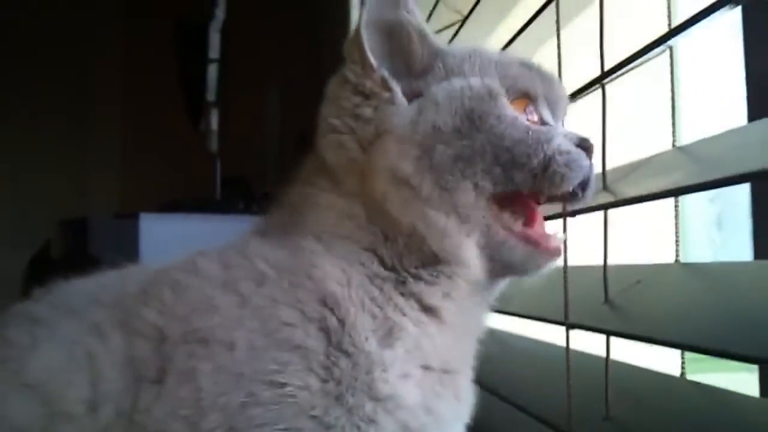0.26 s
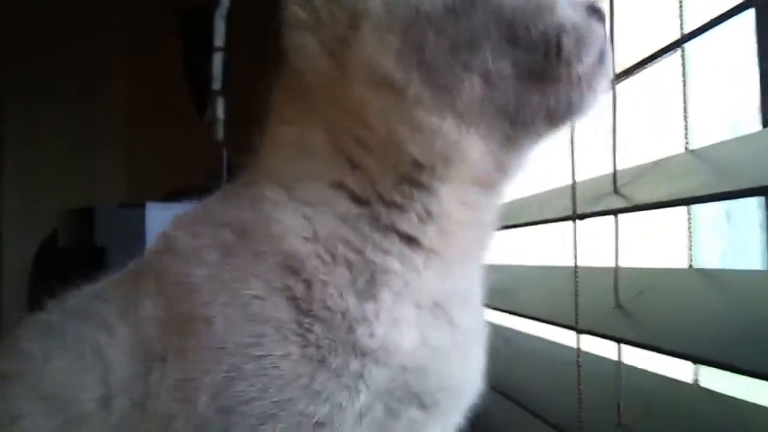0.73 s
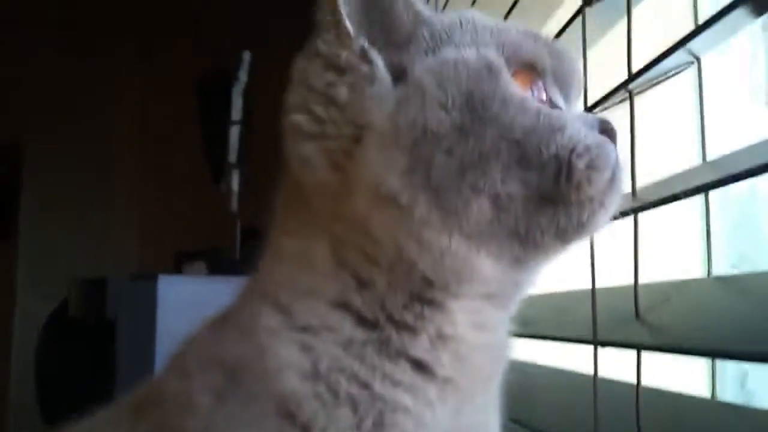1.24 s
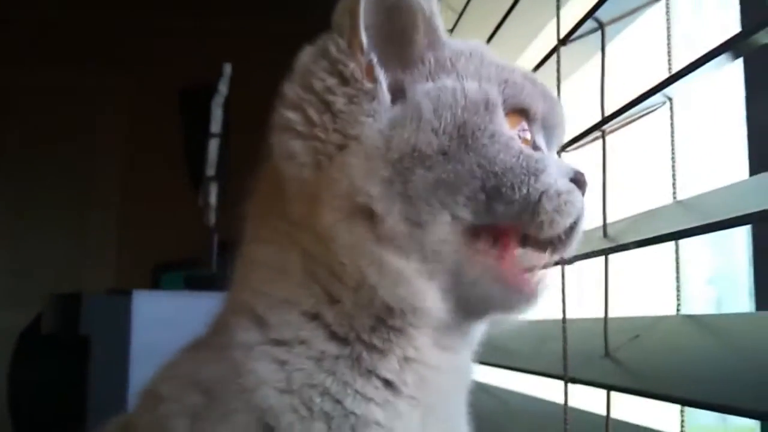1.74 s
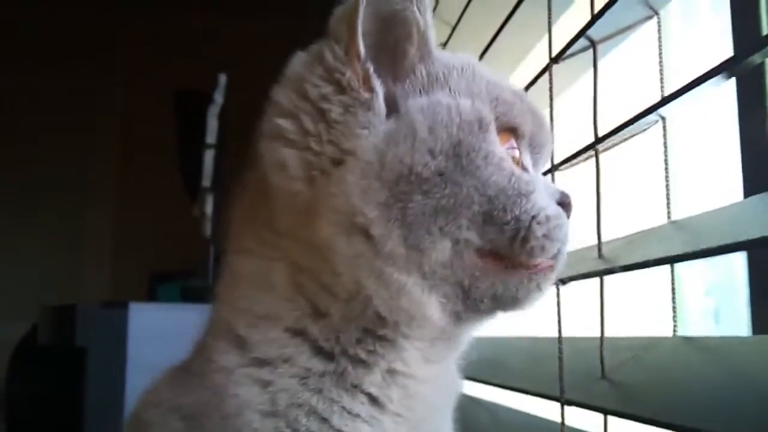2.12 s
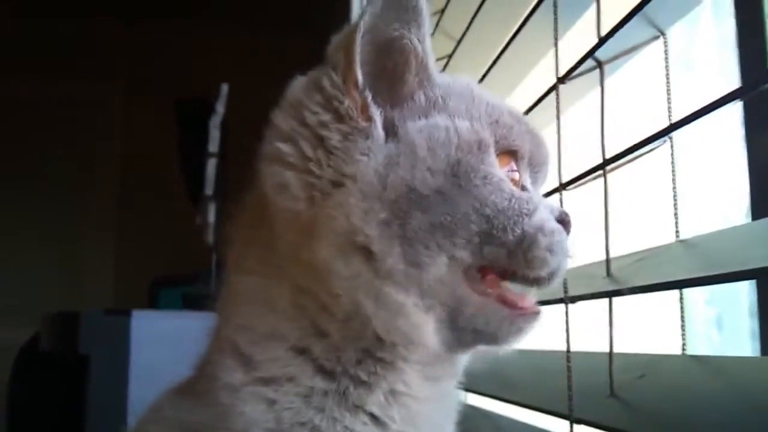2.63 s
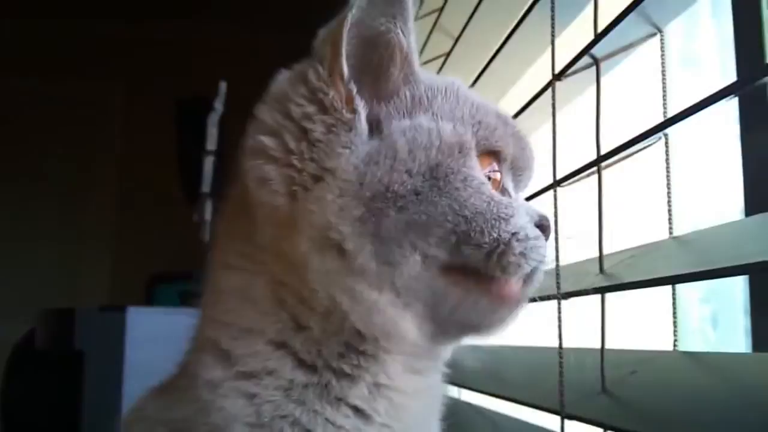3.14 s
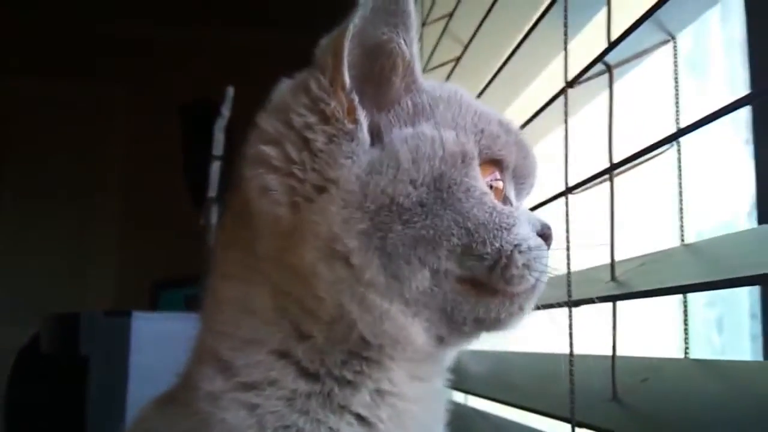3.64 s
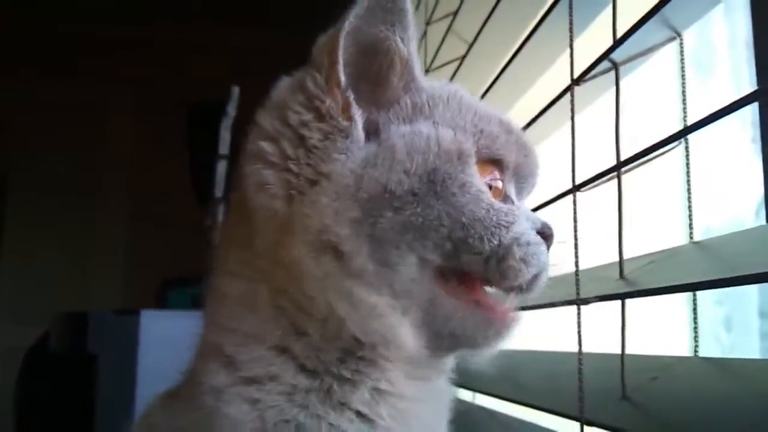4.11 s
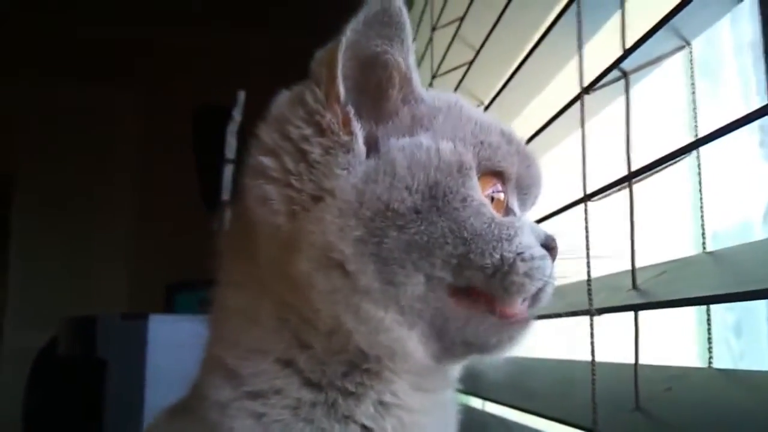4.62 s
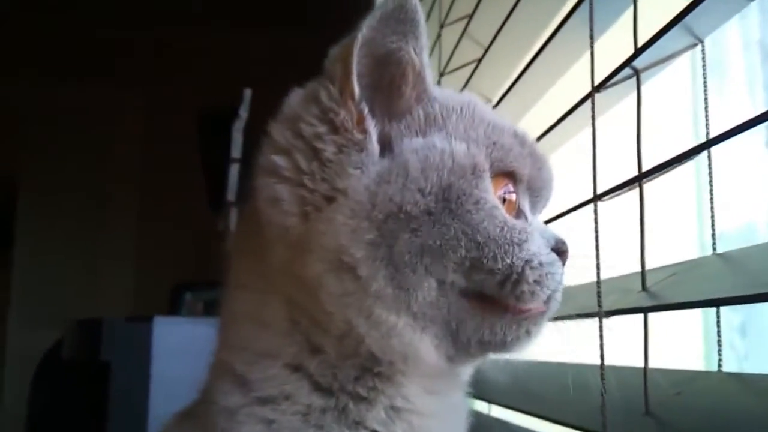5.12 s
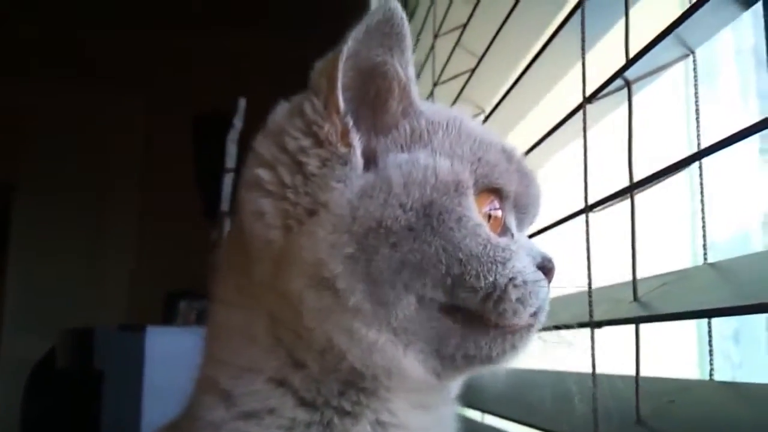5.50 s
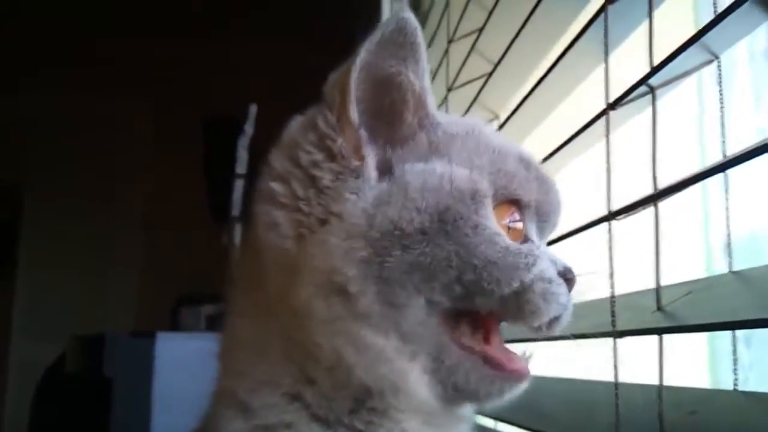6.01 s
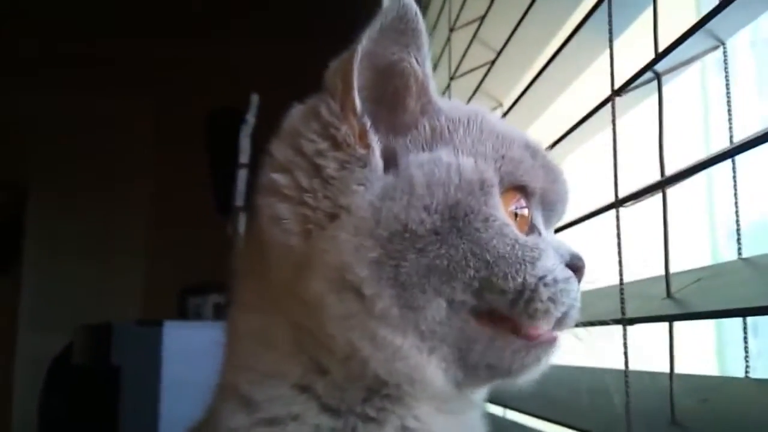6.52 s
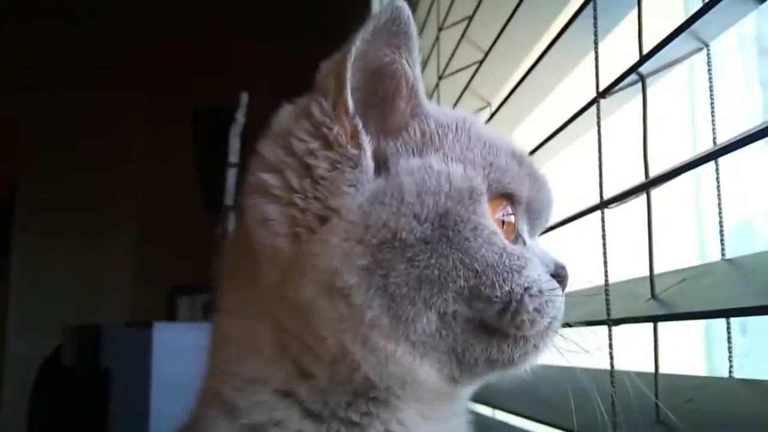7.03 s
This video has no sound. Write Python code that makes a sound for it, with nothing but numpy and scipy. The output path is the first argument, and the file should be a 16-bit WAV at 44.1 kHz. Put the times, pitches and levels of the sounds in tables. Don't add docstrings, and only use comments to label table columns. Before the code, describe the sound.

A steady low mains hum and soft, bass-heavy hiss run throughout, in a small room with a faint short echo. At about 0.6 s a cat close to the microphone makes the loudest sound, a hard wet double clack with bright air and a short throaty blip. A few small ticks follow near 0.9 s, then near quiet with barely audible rustles until a tick at 1.8 s. From 2.0 s come wet smacks and a strong click; between 2.6 and 3.1 s the jaw chatters quickly, about fifteen clicks a second, each with a tiny puff and low squeaky flap. Sparse clicks fall at 3.4-4.0 s, another group at 4.4-5.0 s, then dull smacks and small squeaks to 5.4 s. After a pause, a last even chatter runs 6.1-6.6 s, ending in throaty smacks around 6.85 s and one faint blip at 7.25 s.

```python
import sys
import numpy as np
from scipy import signal
from scipy.fft import rfft, irfft, next_fast_len
from scipy.io import wavfile
from scipy.ndimage import uniform_filter1d

SR = 44100
rng = np.random.default_rng(int(sys.argv[2]) if len(sys.argv) > 2 else 0)


def store_wav(level_fs):
    pcm = np.round(np.clip(np.atleast_2d(level_fs), -1, 1) * 32767)
    wavfile.write(sys.argv[1], SR, pcm.T.astype(np.int16))


def gain_from_db(level_db):
    decades = np.asarray(level_db, float) / 20
    return 10 ** decades


N = 320166


def read(points, hz):
    f, value = np.transpose(points)
    return np.interp(np.log(hz + 1), np.log(f + 1), value)


def evened(x):
    return x / np.sqrt(np.mean(x ** 2) + 1e-20)


def add(mix, s, sound):
    part = mix[round(s * SR):][:len(sound)]
    part += sound[:len(part)]


def colour(x, points):
    size = next_fast_len(N + 4096)
    gain = gain_from_db(read(points, np.fft.rfftfreq(size, 1 / SR)))
    return irfft(rfft(x, size) * gain, size)[:N]


def resonate(x, hz, width_hz):
    r = np.exp(-np.pi * width_hz / SR)
    return signal.lfilter([1, 0, -r], [1, -2 * r * np.cos(2 * np.pi * hz / SR), r * r], x)


SNAP_MS, SNAP_SCATTER = 1.3, .012
CRACKLE_SHARE, EDGE_DB = .3, -7
PUSH_DB, PUSH_MS = -15, 4.4
CAVITY_WIDTHS = [440, 540, 520, 540, 800]


def snaps():
    out = np.zeros(N)
    ms = np.arange(400) / SR * 1000
    rows = clack_snaps() + beat_snaps() + smack_snaps() + tick_snaps()
    chance = rng.standard_normal((len(rows), 405))
    push = -np.sin(2 * np.pi * ms / PUSH_MS) * np.exp(-ms / PUSH_MS) * np.hanning(800)[400:]
    for (s, strengths, pitches), draw in zip(rows, chance):
        crackle = CRACKLE_SHARE * draw[:400] ** 3 / 4 * np.exp(-ms / SNAP_MS)
        crackle[0] = 1
        for k, (db, pitch, width_hz, slip) in enumerate(zip(strengths, pitches, CAVITY_WIDTHS, draw[400:])):
            hz = pitch * (1 + SNAP_SCATTER * slip)
            edge = resonate(crackle, hz, width_hz)
            ring = resonate(edge, hz, width_hz)
            sound = ring / abs(ring).max() + gain_from_db(EDGE_DB) * edge / abs(edge).max()
            add(out, s, (-1) ** k * gain_from_db(db) * sound)
        add(out, s, gain_from_db(min(max(strengths), -24) + PUSH_DB) * push)
    return out


THROAT_HZ, PALATE_HZ, CHEEK_HZ, TEETH_HZ = 1334, 3502, 4916, 6180
FOLLOW = .45
# t/s, tongue f/Hz, teeth f/Hz
MOUTH_SHAPE = [(.58, 2170, 6100), (.64, 2230, 7100), (.9, 2820, 6500), (1.83, 2140, 6700),
               (2.07, 2110, 6800), (2.65, 2200, 6620), (2.78, 2200, 6000), (3.07, 2310, 6320),
               (3.6, 2420, 6230), (4.6, 2360, 5950), (5.0, 2200, 6050), (6.5, 2310, 5860),
               (6.85, 2200, 5800)]


def cavities(s):
    when, tongue, teeth = np.transpose(MOUTH_SHAPE)
    teeth = np.interp(s, when, teeth)
    pull = (teeth / TEETH_HZ) ** FOLLOW
    return np.array([THROAT_HZ, np.interp(s, when, tongue), PALATE_HZ * pull, CHEEK_HZ * pull, teeth])


CLACK_PALATE_DB = -11
CLACK_SHIFT = (.87, 1.03, 1.07, .92, 0.96)
# t/s, front level/dB, teeth over cheek +-level/dB, tongue level/dB, throat level/dB
DOUBLE_CLACK = [
    (.5825, -19.5, -1.5, -24, -40),
    (.586, -19.5, 3, -22.5, -21),
    (.5892, -17.5, 1, -24, -30),
    (0.5931, -26, 5, -15.5, -21),
    (0.6317, -21, 10.5, -23.5, -41),
    (0.6359, -18, 2, -35, -22.5),
    (.6442, -23, 11.5, -34, -23.5),
    (0.6488, -25, 8, -29, -31),
]


def clack_snaps():
    return [(s, [throat, tongue, db + CLACK_PALATE_DB, db - lean, db + lean], cavities(s) * CLACK_SHIFT)
            for s, db, lean, tongue, throat in DOUBLE_CLACK]


BEAT_BACK = (-4.5, -5.5, 0.5)
# t/s, front level/dB, teeth over cheek +-level/dB, back against front level/dB, puff level/dB
JAW_BEATS = [(2.0769, -25, 3.5, -5.5, -34.5), (2.594, -28.5, 4, -5.5, -40.5), (2.6477, -33, 5, 2.5, -35.5),
             (2.716, -29, 2.5, -1.5, -36), (2.779, -36.5, 2, 3.5, -44), (2.8454, -30, 5, -0.5, -36.5),
             (2.908, -34, 2, 2.3, -43.5), (3.013, -31.5, .8, -0.8, -43), (3.0667, -34, 8.5, 0.5, -38),
             (3.7276, -29.5, 0, -4, -41.5), (3.7904, -31, -5, -2.5, -45), (3.9743, -26, .6, -14, -55),
             (4.458, -37, 6, -4.5, -47), (4.5942, -32.5, 5, -2.5, -56), (4.6547, -28.5, -.3, -14, -44),
             (4.79, -30, -0.2, -6, -43), (4.861, -34.5, -3.5, -3, -52), (4.969, -31, 1.2, -15, -60),
             (6.166, -49.5, 6, 8.5, -49), (6.234, -39, 7, -2, -44), (6.2997, -32.5, 3.5, -6.5, -47),
             (6.3656, -30, 1, -6.5, -44), (6.4326, -37, 2, -12, -50), (6.498, -30.5, 0.3, -6, -47)]


def beat_snaps():
    rows = []
    for s, db, lean, back, _ in JAW_BEATS:
        rows.append((s, [*(db + back + np.array(BEAT_BACK)), db - lean, db + lean], cavities(s)))
    return rows


SMACK_BALANCE = (-1.7, -11, -0.5, -2.1, 1.5)
# t/s, back level/dB, front against back level/dB, flap level/dB, flap f/Hz
VOICED_SMACKS = [(2.0096, -34, -12, -21.5, 385), (2.0207, -32.5, -10, -24, 620),
                 (2.0698, -33, -.5, -22.5, 345), (2.2444, -39, -18, -35, 360), (2.586, -39, -8, -35, 420),
                 (2.654, -31.5, -7, -24, 360), (2.7234, -29.5, 0.5, -26.5, 326),
                 (3.0757, -32, 0, -26.5, 300), (3.5363, -41.5, -10, -28.5, 350),
                 (3.6053, -40, -5, -31, 332), (3.7354, -36, 4, -26, 364), (3.8012, -39.5, 1, -28, 335),
                 (4.397, -45, -6, -36, 350), (5.13, -39, -14, -31.5, 360), (5.378, -41.5, -10, -35, 370),
                 (6.105, -38, -4, -32, 326), (6.3152, -40, 3, -32.5, 390), (6.4413, -37.5, -3, -30, 297),
                 (6.5071, -40, -5, -29, 357), (6.6332, -36.5, -4, -28.5, 440), (6.6371, -36, -18, -23, 345),
                 (6.8187, -30, -21, -33, 530), (6.8266, -33.5, -21, -24.5, 356),
                 (6.882, -37.5, -18, -26.5, 348)]
# t/s, back level/dB, front against back level/dB, throat against back level/dB
MUTE_SMACKS = [
    (2.005, -37, -11, 0),
    (2.061, -51, -2.1, 5),
    (2.3032, -39.5, -6, -1.1),
    (2.525, -37, -14, -5),
    (5.0012, -32.5, -14, -2.5),
    (5.1204, -41, -15, -2),
    (5.305, -32, -17, -4),
    (6.8742, -42, -16, 8.5),
]


def smack_snaps():
    front = np.array([0, 0, 0, 1, 1])
    rows = [(s, db + fore * front + SMACK_BALANCE, cavities(s)) for s, db, fore, *_ in VOICED_SMACKS]
    for s, db, fore, throat in MUTE_SMACKS:
        rows.append((s, db + fore * front + [throat, *SMACK_BALANCE[1:]], cavities(s)))
    return rows


# t/s, level/dB, place (0 throat - 4 teeth), fall per cavity level/dB
MOUTH_TICKS = [(.9007, -34, 0.7, 13), (.96, -43, 3.5, 6), (1.836, -26.5, 1.3, 16.5), (1.8913, -34, 1.2, 14),
               (2.0491, -41, 3.5, 9), (2.2196, -40, 2.5, 5), (2.2984, -43, 3, 11), (2.3111, -38, 0.5, 7),
               (2.3737, -39, 1.9, 5), (2.4925, -36.5, 4.5, 2.5), (2.661, -34, 6, 12), (2.8418, -40, 4, 0),
               (2.861, -37, 7, 13), (3.0804, -29, 7, 2.5), (3.436, -34, 2.5, 14), (3.4738, -43, 1.5, 7),
               (3.5955, -43, 2.1, 3), (4.0043, -32, 1.2, 7), (4.276, -38, 3.2, 10), (4.455, -39, 3, 5),
               (4.527, -33, 2.5, 5), (4.733, -34, 2.5, 13), (5.1366, -48, 0, 5), (6.018, -40, 4.5, 20),
               (6.4306, -38, 3.5, 11), (6.6971, -37, 1.8, 4.5)]


def tick_snaps():
    return [(s, db - fall * abs(np.arange(5) - place), cavities(s)) for s, db, place, fall in MOUTH_TICKS]


FLAP_WOBBLE = 0.04
FLAP_RISE_MS, FLAP_RISE = 3.9, 0.18
# multiple of f, level/dB
FOLD_OVERTONES = [(2, -21.5), (3, -29)]


def flaps(rows):
    out = np.zeros(N)
    for (s, db, hz, ms), draw in zip(rows, rng.standard_normal((len(rows), 4000))):
        size = min(round(3 * ms * SR / 1000), 4000)
        u = np.arange(size) / SR * 1000 / ms
        shape = np.sin(np.pi / 2 * (u * ms / 0.7).clip(0, 1)) / (1 + u ** 9)
        wobble = evened(uniform_filter1d(draw, 150))[:size]
        rise = FLAP_RISE * (0.33 * FLAP_RISE_MS / ms - np.exp(-u * ms / FLAP_RISE_MS))
        turns = np.cumsum(hz * (1 + rise + FLAP_WOBBLE * wobble)) / SR
        wave = np.sin(2 * np.pi * turns)
        wave += sum(gain_from_db(d) * np.sin(2 * np.pi * k * turns) for k, d in FOLD_OVERTONES)
        add(out, s, -gain_from_db(db) * shape * wave)
    return out


FLAP_LAG_S, FLAP_SWINGS = 0.0015, 1.35
FLAP_EASY_DB, SWINGS_PER_DB2 = -25, 0.29
FLICK_SWINGS = 0.91
# t/s, peak level/dB, f/Hz
FOLD_FLICKS = [(0.5865, -19, 370), (.5898, -19, 370), (0.5941, -21.5, 382), (.902, -28, 365),
               (0.9593, -35, 430), (2.3005, -30, 537), (3.7473, -28, 448), (4.455, -31.5, 310),
               (4.5943, -33, 300), (4.6551, -29.5, 323), (4.7915, -30.5, 380), (4.8077, -38, 350),
               (5.8396, -34, 546), (6.2343, -32, 290), (6.301, -31.5, 332), (6.431, -29.5, 496),
               (6.8417, -27, 580)]
# t/s, peak level/dB, f/Hz,
# length/ms
SQUEAKS = [(0.6367, -17, 474, 16.6), (1.837, -45, 2230, 11), (1.8391, -32.5, 510, 3.6),
           (1.893, -45, 2220, 13), (2.0254, -42, 530, 7.6), (2.031, -38.5, 697, 19),
           (2.0421, -43, 430, 3.7), (2.0524, -41, 490, 9.6), (2.5949, -28.5, 280, 5.9),
           (2.7772, -33, 280, 6.3), (4.8622, -38, 444, 4.1), (5.136, -37.5, 530, 6.9),
           (5.1589, -31, 480, 3.8), (5.315, -40, 685, 5), (5.4256, -32, 593, 5),
           (6.0271, -34, 540, 4.6), (6.0176, -35, 4900, 4.2), (0.8993, -42, 3120, 5),
           (7.2465, -33.5, 560, 5.6)]


def swings():
    rows = []
    for s, _, _, db, hz in VOICED_SMACKS:
        cycles = FLAP_SWINGS + SWINGS_PER_DB2 * max(db - FLAP_EASY_DB, 0) ** 2
        rows.append((s + FLAP_LAG_S, db, hz, 1000 / hz * cycles))
    return rows + [(s, db, hz, 1000 / hz * FLICK_SWINGS) for s, db, hz in FOLD_FLICKS] + SQUEAKS


def air(rows, width_hz, lower, flutter_db):
    factor, lower_db = lower
    out = np.zeros(N)
    for s, ms, db, hz in rows:
        noise, flutter = rng.standard_normal((2, 4000))
        u = np.arange(4000) / SR * 1000 / ms
        noise *= gain_from_db(flutter_db * evened(uniform_filter1d(flutter, 70)))
        upper = evened(resonate(resonate(noise, hz, width_hz), hz, width_hz))
        under = evened(resonate(resonate(noise, hz * factor, width_hz), hz * factor, width_hz))
        shape = (u / 0.062).clip(0, 1) / (1 + u ** 6.9)
        add(out, s, gain_from_db(db) * (upper + gain_from_db(lower_db) * under) * shape)
    return out


PUFF_LAG_S, PUFF_MS = 0.00048, 19
PUFF_SLIDE = 0.033
# t/s, length/ms, level/dB, centre f/Hz
TEETH_GUSTS = [
    (.583, 10, -22, 6700),
    (.584, 14, -27, 5700),
    (.638, 20, -27, 6800),
    (.641, 20, -23, 5800),
    (.644, 22, -33, 4700),
    (2.064, 32, -36, 6680),
    (2.074, 26, -47, 4300),
    (6.105, 18, -50, 5900),
]


def puffs():
    rows = []
    for s, _, lean, _, db in JAW_BEATS:
        hz = cavities(s)[-1] * (1 + PUFF_SLIDE * min(lean, 0))
        rows.append((s + PUFF_LAG_S, PUFF_MS, db, hz))
    return air(TEETH_GUSTS + rows, width_hz=1350, lower=(0.82, -7), flutter_db=-3.5)


# t/s, length/ms, level/dB, centre f/Hz
SOFT_RUSTLES = [(.634, 13, -34, 1150), (1.175, 45, -53, 950), (1.3, 43, -64, 879.6),
                (1.836, 14, -45.5, 700), (2.004, 39, -46.5, 890), (2.28, 60, -46, 1180),
                (2.345, 49, -51, 1300), (4.003, 9.5, -43, 800), (5.125, 31, -55, 700),
                (5.305, 11, -54, 710), (6.0, 39, -59, 650), (6.633, 23, -44, 700), (6.82, 28, -47, 750)]


def rustles():
    return air(SOFT_RUSTLES, width_hz=700, lower=(1.6, -6), flutter_db=3.5)


# f/Hz, t60/s, level/dB
ROOM_BANDS = [(200, 0.26, -2.5), (480, .36, -11), (800, 0.41, 7), (1300, 0.37, 2.5), (2200, 0.097, 2),
              (3470, 0.097, 2), (5800, 0.35, -9.5), (7500, 0.24, -10.5)]


def room(x):
    taps = np.zeros(SR // 2)
    at = np.arange(150, len(taps) - 20, 20)
    taps[at + rng.integers(0, 20, len(at))] = rng.choice([-1., 1.], len(at))
    hz, t, z = signal.stft(taps, SR, nperseg=256)
    f, t60, db = np.transpose(ROOM_BANDS)
    t60, db = (np.interp(hz, f, v)[:, None] for v in (t60, db))
    decay = gain_from_db(db - 60 * t / t60) / np.sqrt(t60 / t60.mean())
    tail = signal.istft(z * decay, SR, nperseg=256)[1]
    return signal.fftconvolve(x, tail / np.linalg.norm(tail))[:N]


# f/Hz, rms level/dB
MAINS_HUM = [(50, -48), (100, -56.5), (150, -43.5), (200, -64)]


def hum():
    t = np.arange(N) / SR
    return sum(gain_from_db(db) * np.sqrt(2) * np.sin(2 * np.pi * (hz * t + rng.random())) for hz, db in MAINS_HUM)


HISS_DB = -44
# f/Hz, level per Hz/dB
HISS_COLOUR = [(10, -6), (30, -11.5), (100, -6), (300, -8.5), (700, -13.5), (1500, -18.5), (3000, -21.5),
               (7000, -24.5), (9000, -26.5)]


def hiss():
    return gain_from_db(HISS_DB) * evened(colour(rng.standard_normal(N), HISS_COLOUR))


def scene():
    cat = snaps() + flaps(swings()) + puffs() + rustles()
    return (cat + gain_from_db(-15.5) * room(cat) + hum() + hiss())[None]


CONVERTER_HZ, OFFSET = 16000, -.0279
# f/Hz, level/dB
CONVERTER_INPUT = [(6900, 0), (7300, -3), (7700, -11.5), (8000, -22), (8300, -57.5)]
# f/Hz, level/dB
CONVERTER_OUTPUT = [(7000, 0), (8000, 0), (9000, -15), (9600, -27.5), (10200, -41.5), (10700, -67)]


def converter(x):
    band = colour(x, CONVERTER_INPUT)
    mirrored = band * (1 + 2 * np.cos(2 * np.pi * CONVERTER_HZ * np.arange(N) / SR))
    return colour(mirrored, CONVERTER_OUTPUT) + OFFSET


def low_pass(x):
    return signal.sosfilt(signal.butter(12, 10780, fs=SR, output="sos"), x)


def record(dry):
    mix = converter(dry[0])[None]
    return low_pass(mix)


dry = scene()
out = record(dry)
store_wav(out)
```